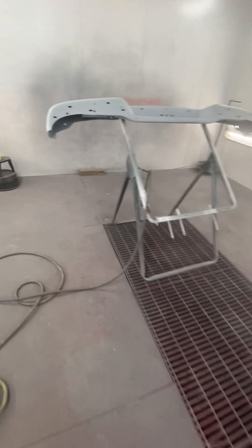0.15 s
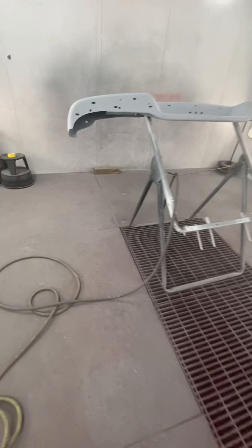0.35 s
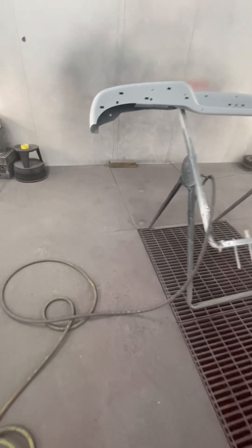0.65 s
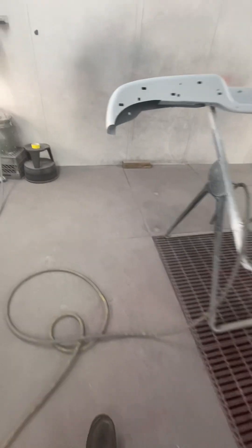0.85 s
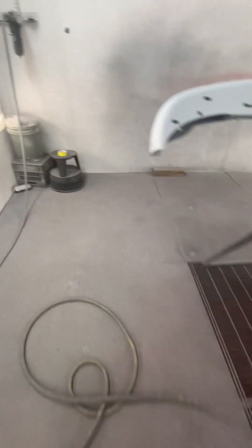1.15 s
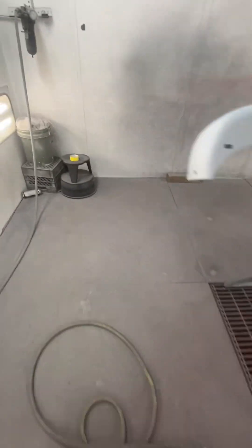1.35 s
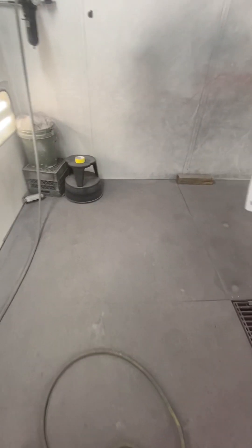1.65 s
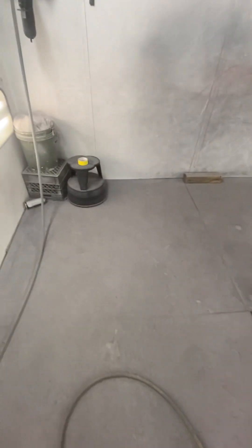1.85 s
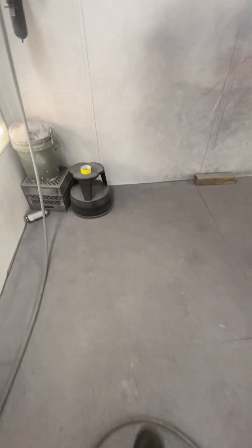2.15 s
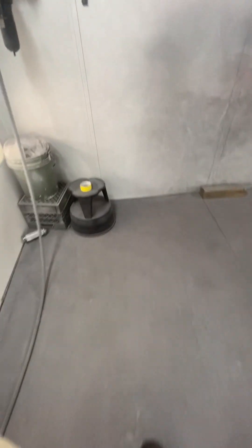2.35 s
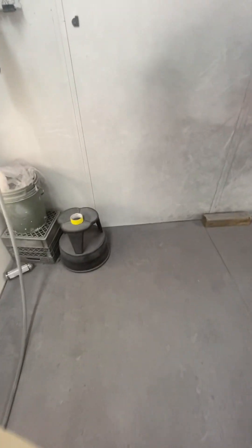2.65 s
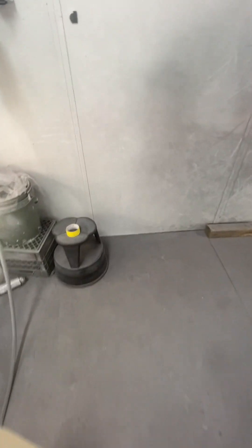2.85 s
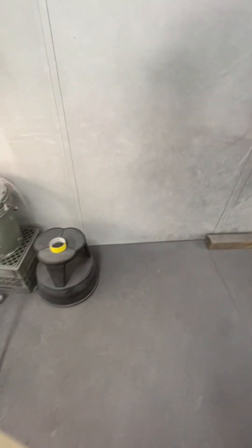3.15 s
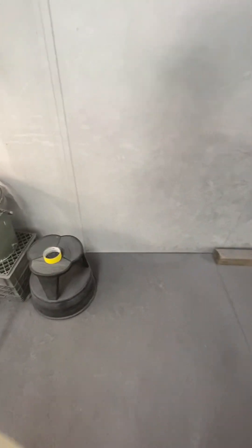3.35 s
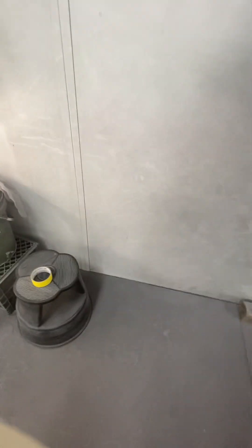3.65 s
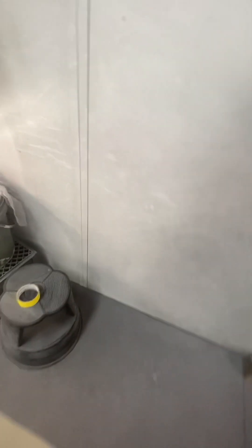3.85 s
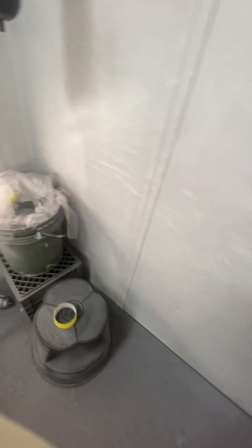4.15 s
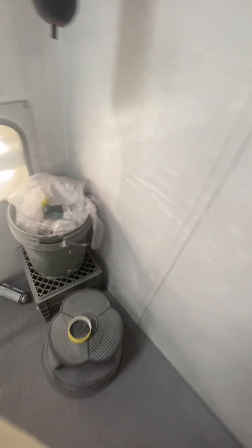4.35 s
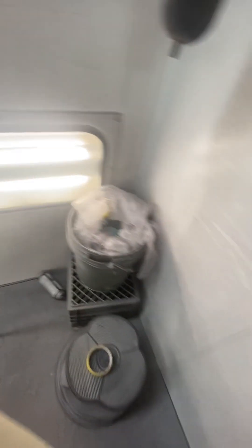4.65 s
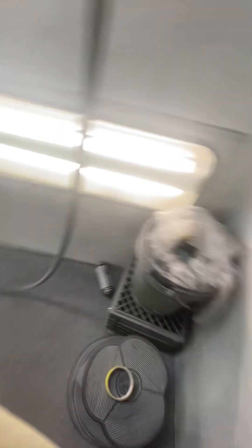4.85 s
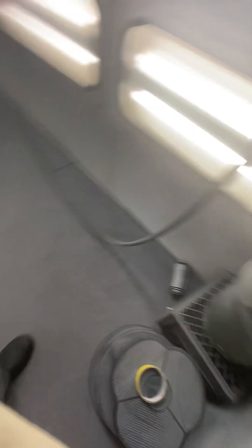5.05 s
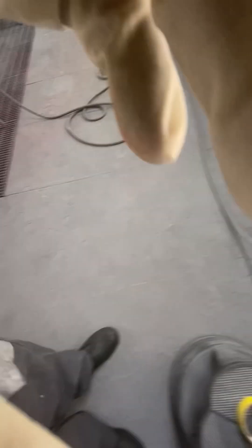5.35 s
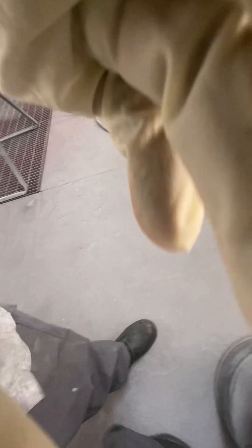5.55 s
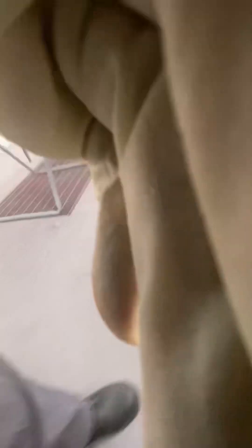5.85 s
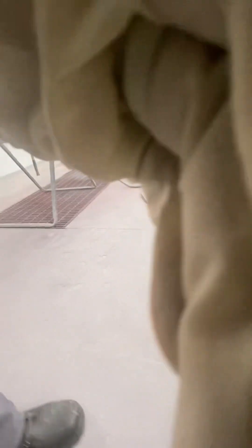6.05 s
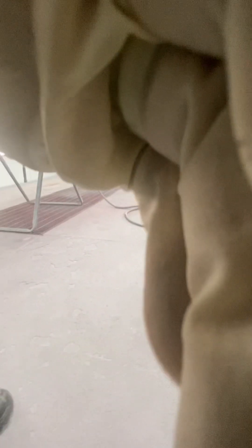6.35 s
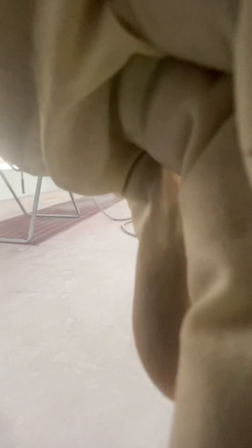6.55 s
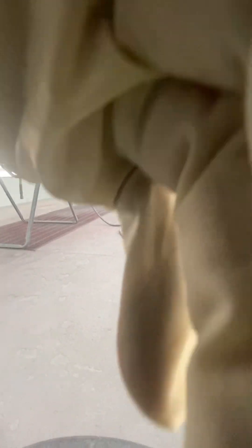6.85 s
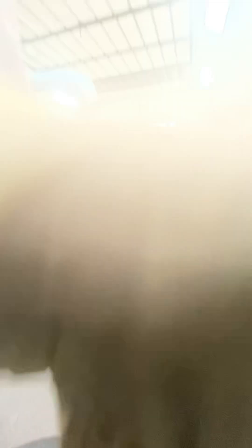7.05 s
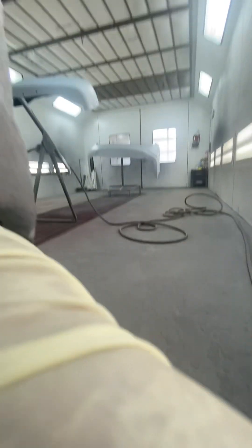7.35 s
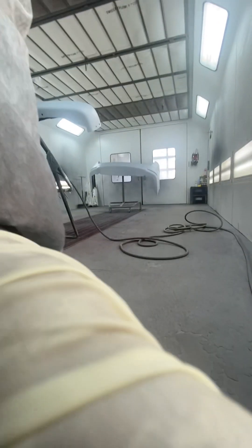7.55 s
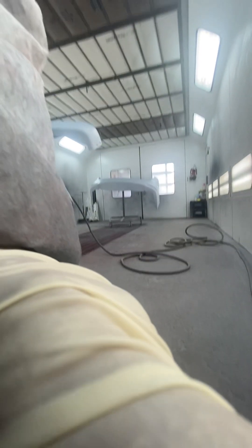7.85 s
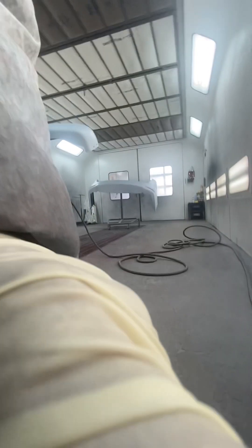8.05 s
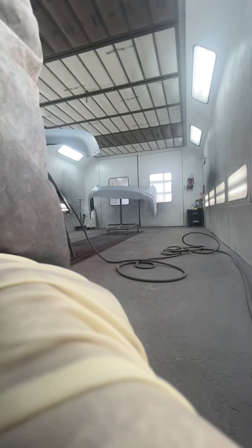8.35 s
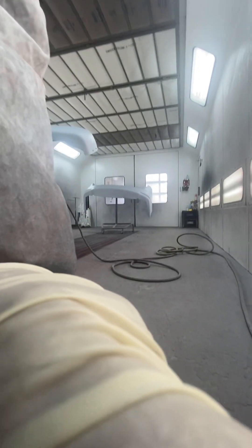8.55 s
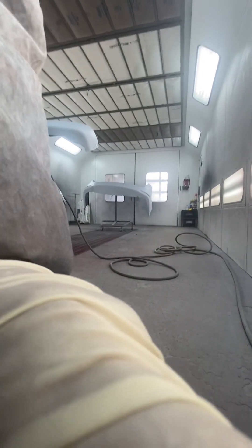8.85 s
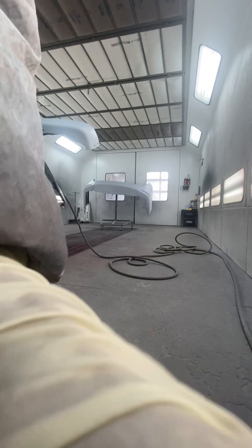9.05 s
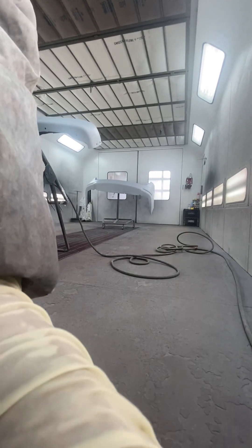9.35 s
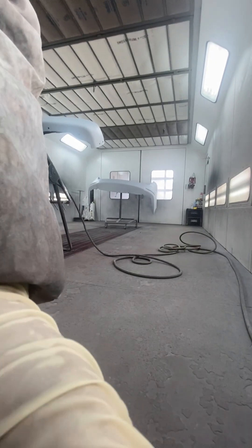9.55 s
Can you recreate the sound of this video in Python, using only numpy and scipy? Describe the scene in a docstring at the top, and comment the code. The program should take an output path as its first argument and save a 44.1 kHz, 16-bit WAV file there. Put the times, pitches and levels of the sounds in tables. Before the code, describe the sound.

Continuous heavy fan drone and airy roar in a ringing steel room, heard close on a handheld stereo microphone. A throbbing higher hum and thin wandering tones lean right, the throb fading once the microphone is lowered. The deep hum nearly vanishes briefly, returns, and grows stronger near the floor. Short sleeve rustles and handling ticks interrupt, the hardest close to the end.

```python
"""A strong fan-blade hum in a paint spray booth: a wavering near-sine that swells, dips and beats.
Around it are a throbbing second hum, faint wandering tones, low duct rumble made of shaped noise,
and a roar of air: noise that rings in the steel room and hisses through the ceiling filters.
Someone carries the microphone to a corner and crouches; a sleeve brushes it with bursts of crackle,
and small handling ticks ring and thud in its case."""
import sys
import numpy as np
from scipy import signal
from scipy.fft import rfft, irfft, next_fast_len
from scipy.io import wavfile
from scipy.ndimage import uniform_filter1d

SR = 44100
rng = np.random.default_rng(int(sys.argv[2]) if len(sys.argv) > 2 else 0)


def dump(signal):
    """Clip the signal to [-1, 1] and save it as 16-bit WAV at the path in sys.argv[1]."""
    limited = np.clip(np.atleast_2d(signal).T, -1, 1)
    pcm = np.round(limited * 32767).astype(np.int16)
    wavfile.write(sys.argv[1], SR, pcm)


N = 427329
TIME = np.arange(N) / SR  # seconds

# How low the microphone is held. Each row: time in seconds, 0 for standing to 1 for crouched.
CROUCH_CURVE = [(0, 0.029), (5.45, 0.085), (6.1, 0.61), (7, 1)]


def gain_of(db):
    """Turns decibels into an amplitude factor."""
    return 10 ** (np.asarray(db) / 20)


def evened(x):
    """Scales a signal to an rms (average strength) of 1."""
    return x / np.sqrt(np.mean(x ** 2) + 1e-20)


def follow(rows, t):
    """Reads each column of a time curve at the times t, with straight lines between rows."""
    s, *columns = np.transpose(rows)
    return [np.interp(t, s, column) for column in columns]


def read(rows, hz):
    """Reads each column of a spectrum at the frequencies hz, along a logarithmic pitch scale."""
    f, *columns = np.transpose(rows)
    return np.array([np.interp(np.log(hz + 1), np.log(f + 1), column) for column in columns])


def bell(hz, centre, width):
    """The shape of one resonance: 1 at its centre and a half at the edges of its width."""
    return 1 / (1 + (2 * (hz - centre) / width) ** 2)


def ring(x, hz, width):
    """Passes a sound through one resonance, which rings longer the narrower it is."""
    return signal.lfilter(*signal.iirpeak(min(hz, SR / 2 - 1), hz / width, SR), x)


def drift(rate_hz):
    """Slow random wandering of rms 1: noise with everything well above rate_hz removed."""
    size = next_fast_len(N)
    hz = np.fft.rfftfreq(size, 1 / SR)
    slow_spectrum = rfft(rng.standard_normal(size)) * np.exp(-(hz / rate_hz) ** 2)
    return evened(irfft(slow_spectrum, size)[:N])


def add(mix, s, sound):
    """Mixes a stereo sound in at time s."""
    part = mix[:, max(round(s * SR), 0):][:, :sound.shape[1]]
    part += sound[:, :part.shape[1]]


def swell_db(t, hz):
    """Gain in dB as the microphone passes through standing waves, which swell and fade in bands."""
    # Each row: band centre in Hz, band width in Hz, curve of (time in seconds, gain in dB).
    swell_bands = [(197.4, 33, [(0, 1), (1, 0.5), (3.5, 0), (4.2, -6), (4.7, -2.5), (5.4, -5), (5.7, 1.5),
                   (6.5, 0), (9.69, 3)]), (264, 83, [(0, -0.5), (1.45, 1), (2.3, -1.5), (4.2, -0.5),
                   (4.7, -4), (5.7, 0.5), (6.45, -2.5), (7, 1), (8.15, -3), (8.7, -2.5), (9.2, -1.5)]),
                   (364, 78, [(0, 2.5), (.45, 3.5), (1.2, -3.5), (1.8, -2), (2.3, 3.5), (3.2, -3),
                   (3.5, -6.5), (3.75, -2), (4.2, 2), (4.6, 0.5), (5.6, 2), (6.2, -3), (6.7, 2), (7.9, 1),
                   (8.5, 0)]), (524, 36, [(0, 2.5), (.45, 4), (1.2, 1.5), (1.6, 2.5), (1.9, -1.5),
                   (2.65, 3), (2.95, -0.5), (3.2, -1.5), (4.1, -2.5), (4.45, 5.5), (5.1, -4.5), (5.5, 8),
                   (5.75, -9), (6.1, 5.5), (6.55, -5), (7.05, 3), (7.8, -4.5)])]
    total_db = 0
    for centre, width, curve in swell_bands:
        flat_topped_band = 1 / (1 + (2 * (hz - centre) / width) ** 4)
        total_db = total_db + follow(curve, t)[0] * flat_topped_band
    return total_db


def rumble(open_booth_db=-27.5, wall_db=4, floor_db=2.5):
    """Duct turbulence booms in the booth's lowest standing wave, stronger at the wall and floor."""
    # Colour of the rumble. Each row: frequency in Hz, relative level in dB per Hz.
    rumble_colour = [(8, -29.5), (30, -25), (40, -15), (52, -5.5), (70, -3.5), (80, -3), (95, -7),
                     (108, -13), (160, -70)]
    boom_hz, boom_width_hz, boom_lift_db = 63.2, 8.4, 7.9
    at_wall_s = 3.45  # the microphone is at the back wall from here on

    hz = np.fft.rfftfreq(N, 1 / SR)
    colour_db = read(rumble_colour, hz)[0] + boom_lift_db * bell(hz, boom_hz, boom_width_hz)
    boom = evened(irfft(rfft(rng.standard_normal(N)) * gain_of(colour_db), N))
    # the fans feed it evenly, so its half-second average power is levelled
    power = uniform_filter1d(boom ** 2, size=SR // 2)
    db = open_booth_db + wall_db * (TIME > at_wall_s) + floor_db * follow(CROUCH_CURVE, TIME)[0]
    return gain_of(db) * boom / np.sqrt(power)


def drones(waver_turns=0.084, flutter_db=1.5, right_db=3.0):
    """Thin motor and duct tones wander in the turbulent flow and change with the microphone's place."""
    # Each row: pitch in Hz, level in dB standing, level in dB crouched, lift in dB deep in the corner.
    drone_tones = [(244.2, -33, -39.5, 0), (286.5, -34, -26.5, 0), (299, -37, -38, 0),
                   (361.3, -31, -49.5, -0.5), (384.6, -33, -34.5, 2.5), (493.5, -51, -34.5, 5),
                   (536, -43.5, -38.5, 8)]
    # Closeness to the side walls. Each row: time in seconds, 0 for mid-booth to 1 for deep in the corner.
    corner_curve = [(0, 0.46), (.9, .15), (3.6, 0.42), (4.4, 1), (5.35, 0.49), (5.6, 0.4)]

    crouch = np.clip(follow(CROUCH_CURVE, TIME)[0], 0, 1)
    corner = follow(corner_curve, TIME)[0]
    out = np.zeros(N)
    for hz, standing_db, crouched_db, corner_db in drone_tones:
        place_db = (1 - crouch) * standing_db + crouch * crouched_db + corner * corner_db
        db = place_db + swell_db(TIME, hz)
        turns = hz * TIME + waver_turns * drift(rate_hz=4.6)
        out += gain_of(db + flutter_db * drift(rate_hz=6.6)) * np.sin(2 * np.pi * turns)
    return out * gain_of([[-right_db / 2], [right_db / 2]])  # louder on the right


def throb(trim_db=-2.0, second_share=0.76, waver_turns=0.21, unsteady_turns=0.26, right_db=2.5):
    """A higher hum: two close fan tones beat against each other, a little unevenly."""
    # Each row: time in seconds, level in dB before the trim.
    throb_level = [(0, -24), (.8, -31.5), (1.3, -25.5), (2.1, -30.5), (2.8, -27), (3.8, -26.5),
                   (4.6, -20.5), (5.0, -30), (5.35, -21), (5.5, -36.5), (9.69, -35)]
    throb_hz, throbs_per_s = 153.1, 4.8

    beat_turns = throbs_per_s * TIME + unsteady_turns * drift(rate_hz=2.24)
    beat = 1 + second_share * np.exp(2j * np.pi * beat_turns)
    turns = throb_hz * TIME + waver_turns * drift(rate_hz=5.0)
    tone = evened((beat * np.exp(2j * np.pi * turns)).imag)
    strength = gain_of(follow(throb_level, TIME)[0] + trim_db)
    return strength * tone * gain_of([[-right_db / 2], [right_db / 2]])  # louder on the right


def air(trim_db=-0.42, patchy_db=1.15, ripple_db=1.72, low_hz=104):
    """Rushing air is noise, coloured by the booth and by where the two microphone ports are held."""
    # Colour of the roar. Each row: frequency in Hz, dB per Hz standing, dB per Hz crouched, before the trim.
    roar_colour = [(110, -48, -49.5), (260, -48, -49.5), (383, -48, -50.5), (638, -54.5, -54),
                   (1020, -62, -61), (1625, -66, -69.5), (2290, -66, -72.5), (2700, -66, -72.5),
                   (3090, -71, -71), (3370, -73.5, -75.5), (3910, -79, -83.5), (5500, -81.5, -84.5),
                   (6180, -84.5, -85), (7440, -92, -94), (9000, -95.5, -96.5), (12800, -99, -99)]
    # Booth and duct resonances. Each row: centre in Hz, width in Hz, lift in dB standing, lift in dB crouched.
    booth_rings = [(126.6, 11.8, 10.5, 9.5), (160, 8.9, 3, 1), (183, 5.7, 5.5, 0.5), (213, 7.7, 1, 5.5),
                   (234.3, 8.2, 6, 5), (250, 12.5, 3, 7.5), (264.1, 11, 10, 1.5), (295.4, 10.5, 7, 9),
                   (322, 18, 2.5, 0), (346.2, 7.7, 9, 6.5), (382.2, 9, 7.5, 4.5), (412.8, 14, 4, 8),
                   (445.5, 7.3, 4, -3), (490.4, 8.9, 6.5, 6.5), (517, 11, 3.5, 2), (533.5, 7.1, 12.5, 10),
                   (548, 7.1, -2, 0.5), (564, 60, -1, 1.5)]
    # The floor's reflection colours the roar as the microphone is lowered.
    # Each row: time in seconds, centre in Hz, lift in dB.
    floor_reflection = [(5.2, 2520, -4.5), (5.8, 2250, 2.5), (6.3, 1850, 4), (7, 1750, 5.5),
                        (7.5, 1400, 1.5), (8.3, 1400, 2.5), (8.8, 2100, 4.5)]
    # How the roar meets the two ports, standing and crouched. Each row: frequency in Hz,
    # likeness of the two sides from 0 to 1, lead of the left in radians, left minus right in dB.
    standing_ports = [(110.0, 0.99, -0.12, -0.9), (260.0, 0.97, -0.03, -2.8), (400.0, 0.7, 0.12, -4.5),
                      (650.0, 0.33, 1.86, -1.2), (1000.0, 0.38, 2.04, 1.7), (1600.0, 0.5, 1.3, 3.0),
                      (2300.0, 0.47, 1.89, 0.9), (3200.0, 0.57, 1.97, 0.3), (4100.0, 0.5, 1.19, 0.4),
                      (5500.0, 0.66, 0.2, 0.2), (6600.0, 0.36, 1.47, -1.0), (7700.0, 0.78, 3.21, -0.5),
                      (10000.0, 0.8, 6.25, -0.1), (12200.0, 0.6, 8.51, -0.2)]
    crouched_ports = [(110.0, 1.0, -0.15, -1.0), (260.0, 0.98, -0.0, -2.0), (400.0, 0.81, 0.14, -6.5),
                      (650.0, 0.71, 0.45, -4.1), (1000.0, 0.65, 0.73, -0.7), (1600.0, 0.81, 0.46, 0.5),
                      (2300.0, 0.36, 0.96, -0.3), (2850.0, 0.7, 2.4, 0.0), (3250.0, 0.88, 3.0, 0.1),
                      (4100.0, 0.58, 0.65, -0.3), (5500.0, 0.58, 0.05, -0.1), (6600.0, 0.37, 1.47, -0.6),
                      (7700.0, 0.88, 3.05, -0.2), (10000.0, 0.8, 6.23, -0.1), (12200.0, 0.6, 8.33, -0.3)]

    frame, hop = 4096, 1024  # samples
    per_hz = np.sqrt(3 * SR / (8 * hop))  # scales the noise so that its levels are per Hz
    frame_s = np.arange(N // hop + 3) * hop / SR
    bin_hz = np.fft.rfftfreq(frame, 1 / SR)
    crouch = np.clip(follow(CROUCH_CURVE, frame_s)[0], 0, 1)[:, None]

    def blend(standing, crouched):
        """Moves from the standing value to the crouched one."""
        return (1 - crouch) * standing + crouch * crouched

    db = blend(*read(roar_colour, bin_hz))
    for hz, width, standing_db, crouched_db in booth_rings:
        db = db + blend(standing_db, crouched_db) * bell(bin_hz, hz, width)
    reflection_hz, lift_db = follow(floor_reflection, frame_s[:, None])
    db = db + lift_db * bell(bin_hz, reflection_hz, width=800)

    a, b, c, d, eddies, ripple = rng.standard_normal((6, len(frame_s), len(bin_hz)))
    # eddies make broad patches of the roar stronger or weaker
    eddies = uniform_filter1d(eddies, size=8, axis=0)
    eddies = evened(uniform_filter1d(eddies, size=20, axis=1))
    # standing waves leave narrow peaks and dips that shift slowly as the microphone moves
    ripple = uniform_filter1d(ripple, size=70, axis=0)
    ripple = evened(uniform_filter1d(ripple, size=2, axis=1))
    db = db + trim_db + patchy_db * eddies + ripple_db * ripple
    db = db + swell_db(frame_s[:, None], bin_hz)

    # the right port hears part of the same air, shifted in phase, and part of its own
    likeness, lead, balance_db = map(blend, read(standing_ports, bin_hz), read(crouched_ports, bin_hz))
    likeness = np.clip(likeness, 0, 1)
    left = a + 1j * b
    right = likeness * np.exp(-1j * lead) * left + np.sqrt(1 - likeness ** 2) * (c + 1j * d)
    ports = np.array([left * gain_of(balance_db / 2), right * gain_of(-balance_db / 2)])
    spectra = ports * gain_of(db) * per_hz
    wave = signal.istft(spectra.transpose(0, 2, 1), nperseg=frame, noverlap=frame - hop)[1]
    return signal.sosfilt(signal.butter(4, low_hz, "high", fs=SR, output="sos"), wave[:, :N])


def sleeve(snags_per_s=2000, grain_db=4.0, stutter_db=2.0):
    """Cloth fibres snag and let go in clumps of fine crackle under each stroke."""
    # Each row: middle of the stroke in seconds, length in seconds, level in dB,
    # centre of its sound in Hz, width in Hz of the resonance it passes through twice.
    strokes = [(3.48, .12, -63, 9500, 4200), (3.535, .022, -37, 3000, 2000), (3.583, .1, -50, 4000, 3000),
               (5.635, .3, -57, 10200, 5000), (5.77, 0.28, -52.5, 6500, 5000),
               (6.2, .5, -63.5, 10000, 4500), (6.85, 0.32, -64, 9800, 4500),
               (8.428, .085, -49.5, 5900, 2400)]
    out = np.zeros((2, N))
    stutter = gain_of(stutter_db * drift(rate_hz=22))
    for s, length, db, hz, width_hz in strokes:
        n = round(length * SR)
        happens = rng.random((2, n)) < snags_per_s / SR
        size = gain_of(grain_db * np.minimum(rng.exponential(1, (2, n)), 4))
        snags = happens * size * rng.choice([-1, 1], (2, n))
        crackle = ring(ring(snags, hz, width_hz), hz, width_hz)
        crackle = crackle * stutter[round(s * SR):][:n]
        rise_and_fall = np.sqrt(2) * np.sin(np.pi * np.arange(n) / n)
        add(out, s - length / 2, gain_of(db) * evened(crackle) * rise_and_fall)
    return out


def ticks(snap=4.5, thud_hz=470, thud_rise_s=.0027):
    """A snap and scrape of hard parts ring in the case and thud in its body; the grip damps the ring."""
    # Each row: start in seconds, peak of the ring in dB, time in seconds for the scrape to fall 60 dB,
    # thud of the body in dB, brightness in dB per octave, damping as a factor on the ring's widths.
    tick_list = [(3.528, -27, .035, -38, -2, 3), (3.53, -19, .08, -30, -4.5, 1.6),
                 (5.674, -27.5, .006, -45, 9, 4), (5.682, -29, .03, -46, -1, 3),
                 (5.839, -28, .012, -43, -3, 2), (8.672, -22, .02, -37, -4, 3),
                 (8.8596, -11, 0.0095, -8.5, 1, .8), (8.863, -23, .016, -28, 0, 1.2)]
    # What a tick rings with. Each row: centre in Hz, width in Hz before damping, relative level in dB.
    case_rings = [(760, 410, 14.5), (1400, 650, 11), (2640, 800, 5.5), (4000, 180, 13), (4970, 380, 14),
                  (5900, 410, 7), (7460, 1200, 2), (11800, 3500, -3.5)]

    out = np.zeros((2, N))
    t = np.arange(SR // 8) / SR
    thud_shape = (t / thud_rise_s * np.exp(1 - t / thud_rise_s)) ** 2
    thud = np.sin(2 * np.pi * thud_hz * t) * thud_shape
    for s, db, t60, thud_db, bright_db, damping in tick_list:
        noise = rng.standard_normal((3, len(t)))
        # one noise is common to both sides; each side adds a weaker one of its own
        scrape = (noise[2] + .5 * noise[:2]) * gain_of(-60 * t / t60)
        strike = scrape + snap * (t == 0)
        tick = np.zeros((2, len(t)))
        for k, (hz, width, mode_db) in enumerate(case_rings):
            strength = (-1) ** k * gain_of(mode_db + bright_db * np.log2(hz))
            tick += strength * ring(strike, hz, min(width * damping, hz / 2))
        add(out, s, gain_of(db) * tick / abs(tick).max() + gain_of(thud_db) * thud)
    return out


def hum(trim_db=-0.35, waver_turns=0.01, flutter_db=0.5):
    """The blade tone, nearly a sine; the fans beat for a while, and uneven inflow makes it waver."""
    # It swells as the microphone moves through its standing wave.
    # Each row: time in seconds, level in dB before the trim.
    hum_level = [(0, -22.5), (.3, -23), (.55, -21.5), (.8, -20), (1.0, -17.5), (1.22, -14), (2.05, -17),
                 (2.46, -34), (2.84, -36), (2.98, -18), (4.1, -17.5), (4.3, -13), (4.55, -16), (4.87, -12),
                 (5.08, -15.5), (5.29, -10), (5.63, -17), (5.85, -12.5), (6.36, -11.5), (6.6, -13),
                 (7.0, -15), (7.7, -12), (8.0, -14.5), (8.28, -11), (8.5, -14), (8.9, -11), (9.3, -10.6),
                 (9.69, -14.5)]
    # The level dips briefly. Each row: middle of the dip in seconds, depth in dB.
    brief_dips = [(.41, 16), (1.71, 13), (2.1, 8), (4.11, 3), (5.14, 4.5), (6.5, 11), (6.78, 4),
                  (6.93, 6.7), (7.22, 8.3), (8.76, 3.9), (9.552, 6.1)]
    hum_hz, dip_s = 86.9, 0.03  # dip_s: time from the middle of a dip to 1/e of its depth in dB
    # the beating is fullest at swell_s and has faded to 1/e half_s before and after
    swell_s, half_s, beats_per_s, depth = 1.546, 0.66, 2.8, 0.35

    since = TIME - swell_s
    second_tone = depth * np.exp(-(since / half_s) ** 2) * np.exp(2j * np.pi * beats_per_s * since)
    beat = 1 + second_tone
    dip_db = sum(db * np.exp(-((TIME - s) / dip_s) ** 2) for s, db in brief_dips)
    level_db = follow(hum_level, TIME)[0] + trim_db - dip_db
    strength = gain_of(level_db + flutter_db * drift(rate_hz=6.9))
    turns = hum_hz * TIME + waver_turns * drift(rate_hz=2.5)
    return strength * np.sqrt(2) * (beat * np.exp(2j * np.pi * turns)).imag


def scene(bass_lag_s=0.00025):
    """The bass reaches both ports alike, a little earlier and stronger on the right."""
    bass = hum() + rumble()
    left_bass = np.interp(TIME - bass_lag_s, TIME, bass)
    both_bass = np.array([left_bass, bass]) * gain_of([[-.4], [.4]])
    return both_bass + throb() + drones() + air() + sleeve() + ticks()


def record(dry, edge_hz=12800):
    """Clips the sound just below full scale, then low-passes it steeply at edge_hz."""
    low_pass = signal.firwin(511, edge_hz, window=("kaiser", 9), fs=SR)
    return signal.oaconvolve(np.clip(dry, -.98, .98), low_pass[None], "same")


dry = scene()
out = record(dry)
dump(out)
```